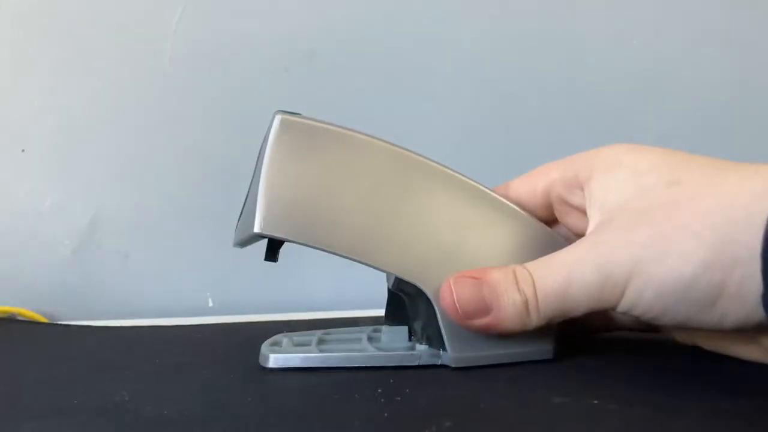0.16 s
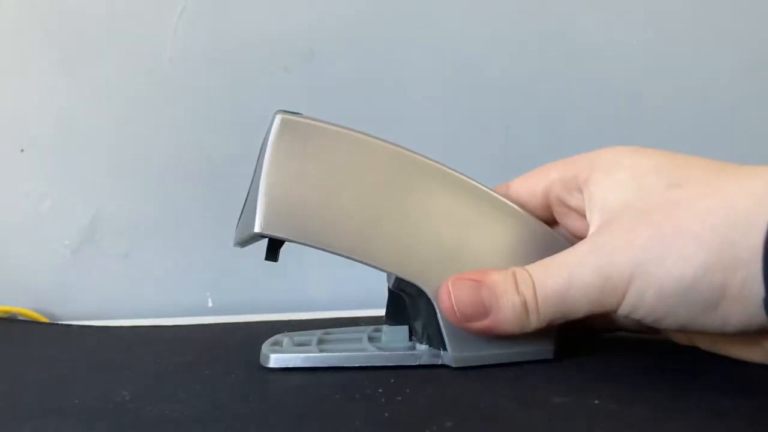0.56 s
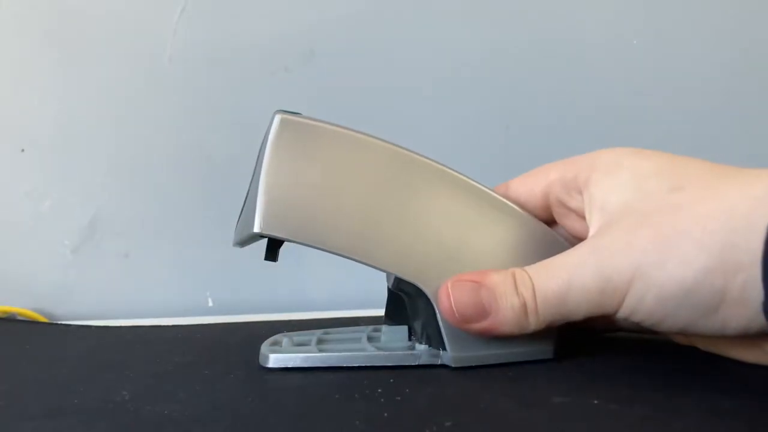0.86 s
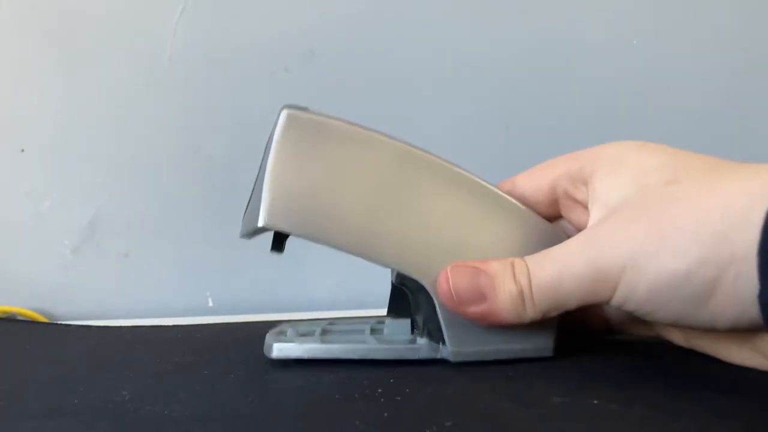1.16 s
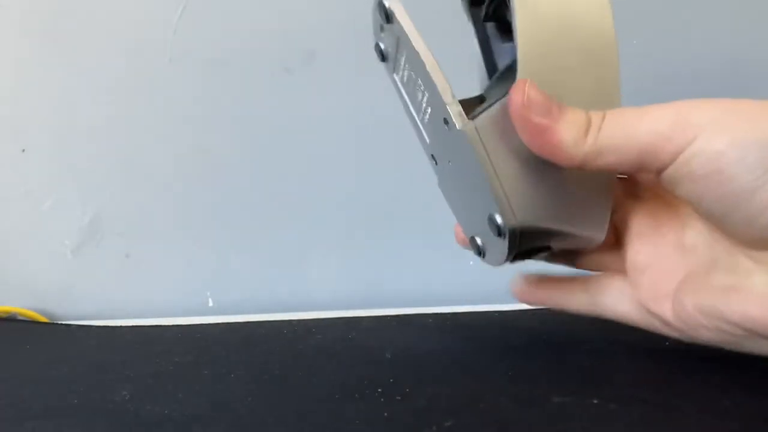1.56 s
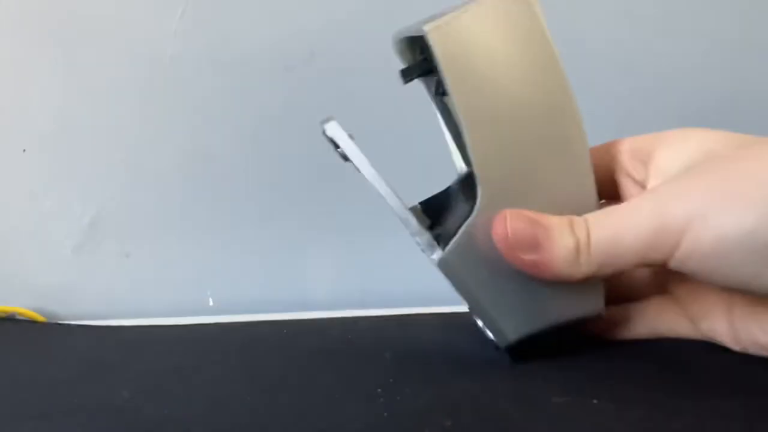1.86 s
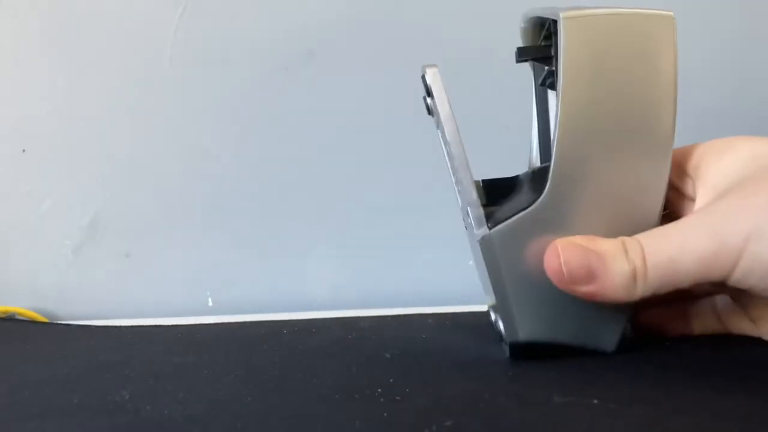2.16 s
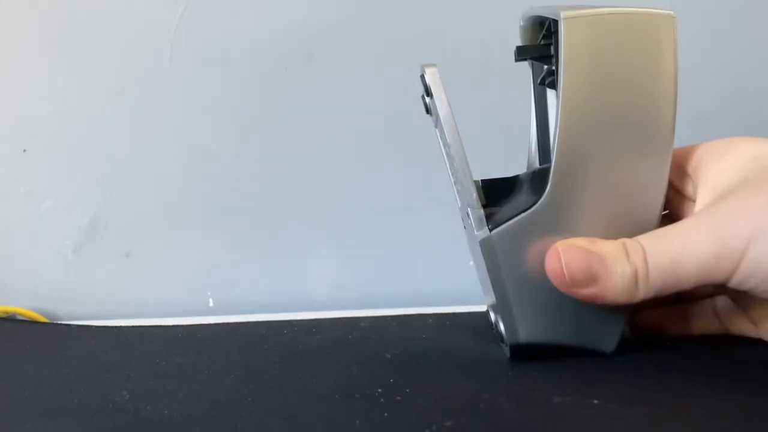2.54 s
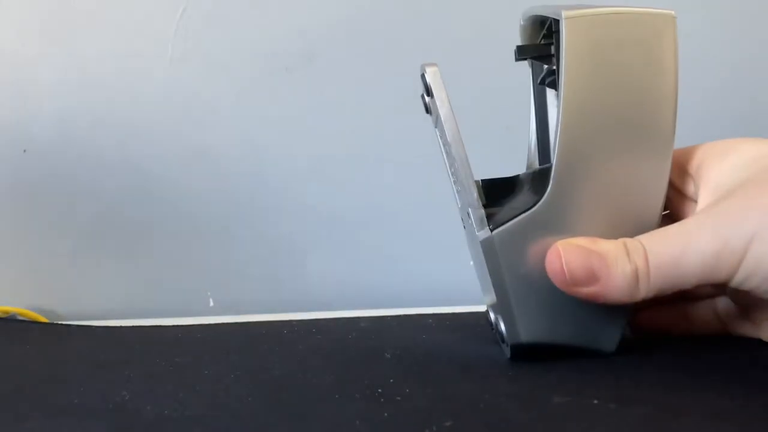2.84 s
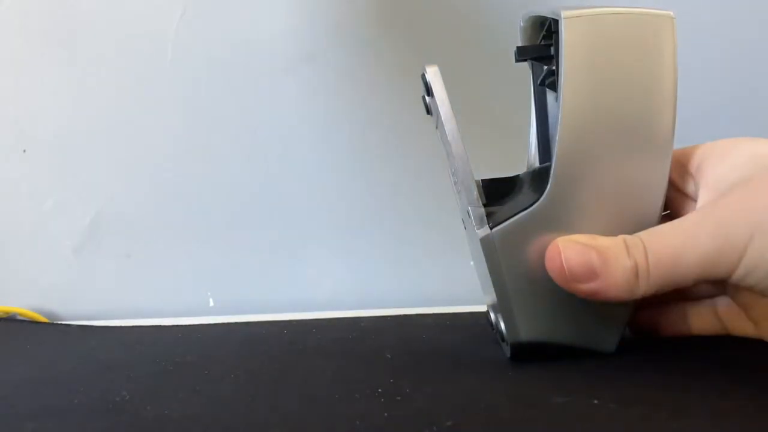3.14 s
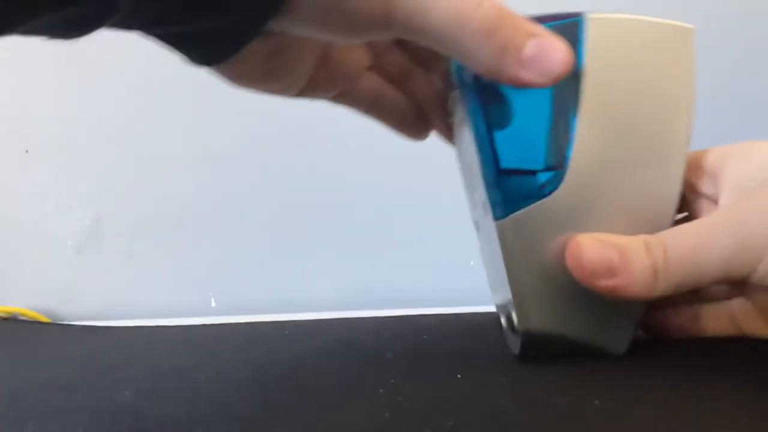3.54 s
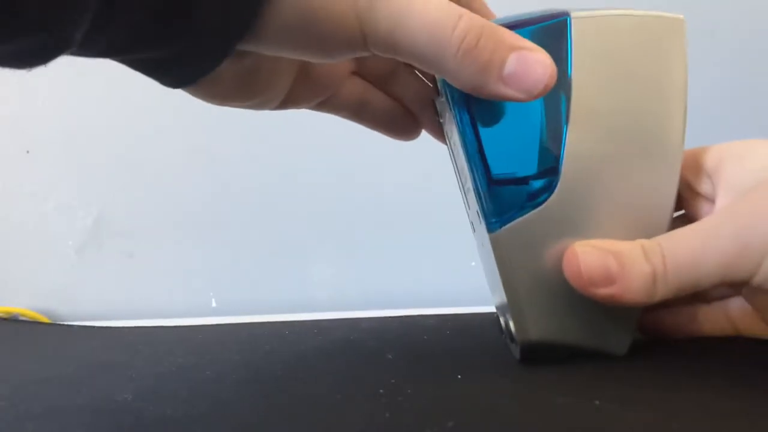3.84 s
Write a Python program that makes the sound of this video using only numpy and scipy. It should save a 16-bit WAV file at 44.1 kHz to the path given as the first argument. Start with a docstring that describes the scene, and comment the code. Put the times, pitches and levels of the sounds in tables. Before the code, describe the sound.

Sharp plastic snap with a quick run of clicks, preceded by light handling and a thump.

```python
"""A close stereo pair in a small quiet room: air and a wavering hum, as a container slides away over cloth.
Sleeve and palm rustle as a hand lifts a plastic stapler off a cloth-covered desk and stands it on its heel.
Loose parts tick, the hollow base knocks, the spring pings and the heel drags: modes, thumps and noise.
A container knocks the shell, scrapes its guides as dense tiny slips, and snaps in with a run of clicks.
The overall level dips briefly, comes back a little higher, and a faint tone comes and goes."""
import sys
import numpy as np
from scipy import signal
from scipy.fft import rfft, irfft
from scipy.io import wavfile
from scipy.ndimage import uniform_filter1d

SR = 44100
rng = np.random.default_rng(int(sys.argv[2]) if len(sys.argv) > 2 else 0)


def put_to_file(sound):
    """Save the sound as 16-bit audio at rate SR, in the file named by the first command-line argument."""
    columns = np.atleast_2d(sound).T  # one column per channel
    safe = np.clip(columns, -1, 1)
    whole_steps = np.round(safe * 32767)
    wavfile.write(sys.argv[1], SR, whole_steps.astype(np.int16))


N = 176400  # 4 s

# All levels are relative: the room, the overall level and the microphone act on them later.
# air of the room: (frequency [Hz], level [dB per Hz])
AIR_SPECTRUM = [(20, -33.5), (60, -1), (140, -5.5), (250, -5), (330, -14.5), (520, -13.5), (760, -23.5),
                (1600, -39), (4000, -51.5), (16000, -61.5)]
# steady hum lines: (frequency [Hz], level [dB])
HUM_LINES = [(144, -56.5), (361, -66.5)]
AIR_DB = -53
HUM_WAVER = 0.09  # rms share of each line

# container sliding away over the cloth: (frequency [Hz], level [dB per Hz])
SLIDE_SPECTRUM = [(600, -8.5), (1700, -2.5), (2600, -1.5), (3600, -10), (4700, -4.5), (16000, -30)]
SLIDE_DB, SLIDE_T60_S = -44.5, 0.28

# sleeve and hand rubbing: (time [s], treble level [dB], middle level [dB])
RUB_LEVELS = [(0, -53, -80), (0.28, -67, -70.5), (0.36, -100, -86), (0.89, -100, -80), (0.99, -72, -59),
              (1.09, -63.5, -63), (1.14, -87, -77), (1.2, -70.5, -65.5), (1.37, -61.5, -60),
              (1.55, -73.5, -83.5), (1.66, -61, -53.5), (1.74, -62, -53), (1.82, -73, -68.5),
              (1.95, -74, -76), (2.01, -62, -61), (2.14, -71, -65.5), (2.22, -100, -106)]
# treble of the sleeve: (frequency [Hz], level [dB per Hz])
SLEEVE_SPECTRUM = [(1000, -12.5), (4400, 0), (5700, -7), (7600, 2), (9200, -9.5), (16000, -6)]
# middle of the palm: (frequency [Hz], level [dB per Hz])
PALM_SPECTRUM = [(400, -21), (970, -0.5), (1200, -1.5), (1450, -2), (1900, -10), (8000, -37.5)]
# unevenness of slips: cloth of the sleeve, and the coarser rubs of palm and plastic
SLEEVE_SPREAD_DB, COARSE_SPREAD_DB = 2.2, 4.5
SLIPS_PER_S, GRIP_FLUTTER_DB = 6000, 0.9  # average rate; rms unsteadiness

# contacts of plastic parts:
# (time [s], ring level [dB], most excited pitch [Hz], crack level [dB], tick level [dB])
PLASTIC_CONTACTS = [ (0.671, -46, 1050, -50, -67), (0.958, -40.5, 874, -66, -80),
                    (1.7166, -30, 1300, -35, -61), (1.7229, -27, 1000, -28, -43),
                    (1.7321, -32.5, 1400, -32.5, -41.5), (1.883, -52.5, 1100, -56, -85),
                    (2.134, -31, 1480, -39.5, -52), (2.642, -50, 980, -55, -76),
                    (2.668, -46, 850, -48.5, -56.5), (3.2719, -19.5, 1100, -12.5, -12.5),
                    (3.2752, -8, 850, -8.5, -24), (3.2776, -16.5, 950, -17, -29.5),
                    (3.319, -15.5, 1300, -20, -27), (3.3294, -12, 1247, -16, -25.5),
                    (3.3461, -4.5, 1100, -14.5, -16), (3.3479, -5.5, 1400, -20.5, -26.5),
                    (3.3551, -11.5, 850, -15, -12.5), (3.3584, -21, 1300, -22.5, -13.5),
                    (3.362, -13.5, 1400, -23, -21), (3.3647, -12, 855, -16, -25),
                    (3.553, -43.5, 950, -56, -79)]
# pitches of the shell modes: (frequency [Hz])
SHELL_MODES_HZ = [638, 818, 941, 1037, 1147, 1270, 1427, 1528, 1952, 2442]
# strengths of the shell modes, in the same order: (level [dB])
SHELL_MODES_DB = [-2, -2.5, -2, -6, -4, -10, -2, -4, -10.5, -1]
# dense upper modes after a blunt contact: (frequency [Hz], level [dB per Hz])
CRACK_SPECTRUM = [(100, -2), (350, 1), (520, -6), (900, -1.5), (1600, 0), (2800, -6.5), (4000, -5),
                  (5200, -15), (7500, -24), (16000, -26.5)]
# dense upper modes after a sharp contact: (frequency [Hz], level [dB per Hz])
TICK_SPECTRUM = [(1500, -18.5), (5500, -17), (6600, 1.5), (7600, 4), (9000, -14), (10200, -2),
                 (13300, -13.5), (15300, -12), (17000, -24)]
SHELL_T60_S, CRACK_T60_S, TICK_T60_S = 0.032, 0.022, 0.02
RING_RISE_S, CONTACT_RISE_S = 0.001, 0.00052
SHARED_POWER = 0.11  # part of the crack and tick power that is the same in every contact
FOCUS_DB_PER_OCTAVE2 = 24.5  # loss of a mode with its squared distance from the excited pitch

# hollow base as it tips up, lands and is pushed: (time [s], level [dB], most excited pitch [Hz])
BASE_HITS = [(0.96, -23, 275), (1.727, -20, 343), (3.274, -12, 380)]
# modes of the hollow base: (frequency [Hz], level [dB], decay T60 [s])
BASE_MODES = [(239, 4.5, 0.05), (331, -2, 0.04), (376, 2.5, 0.03), (514, 0.5, 0.029)]
BASE_RISE_S = 0.0052

# blows passed on to the desk: (time [s], level [dB], pitch [Hz], decay T60 [s])
DESK_THUMPS = [(1.7246, 4.5, 100, 0.0535), (3.2788, 5.5, 109.1, 0.064)]
# slower modes of the desk: (frequency [Hz], level [dB], decay T60 [s])
DESK_MODES = [(57.4, -27.5, 0.088), (81.25, -14.5, 0.1)]
THUMP_RISE_S = 0.011

# pings of the metal spring: (time [s], level [dB], most excited pitch [Hz])
SPRING_PINGS = [(1.779, -46.5, 2760), (2.639, -64, 3900), (2.663, -53, 4500), (2.671, -45, 4470),
                (2.718, -76, 4400), (3.2748, -7.5, 7500), (3.276, -18, 3587)]
# modes of the metal spring: (frequency [Hz], level [dB], decay T60 [s])
SPRING_MODES = [(2436, -1.5, 0.033), (3260, -8.5, .06), (4360, -1, 0.049), (7400, -0.5, 0.0066)]

# heel dragging on the desk, its end levels held: (time [s], level [dB])
DRAG_LEVELS = [(1.78, -68), (1.9, -44), (2.14, -45.5), (2.23, -61)]
# low noise of the drag: (frequency [Hz], level [dB per Hz])
DRAG_SPECTRUM = [(25, -19), (55, 4), (105, -1.5), (170, -19.5), (1500, -52)]

# plastic sliding on plastic: (time [s], length [s], level [dB])
SCRAPE_STROKES = [(2.626, 0.13, -60.5), (3.248, 0.1, -25)]
# sound of the scrape: (frequency [Hz], level [dB per Hz])
SCRAPE_SPECTRUM = [(400, -14.5), (1100, 9.5), (1450, 6), (1800, 0), (4200, -11), (7500, -18), (16000, -33)]

# faint tone after the snap
TONE_S, TONE_LENGTH_S, TONE_HZ, TONE_DB = 3.63, 0.3, 705, -66

# overall level, with a brief dip after the snap: (time [s], level [dB])
OVERALL_LEVEL = [(3.37, 1.5), (3.45, -12), (3.54, -4.5), (3.62, 4.5)]
# diffuse decay of the room: (frequency [Hz], decay T60 [s])
ROOM_DECAY = [(60, 0.15), (250, 0.57), (900, 0.27), (5000, 0.24), (15000, 0.11)]
# near reflections: (delay left [s], delay right [s], gain [linear])
NEAR_ECHOES = [(.0031, 0.0026, 0.21), (.0074, 0.0065, 0.26)]
ROOM_DB, ROOM_ONSET_S = -13.5, 0.0025
# likeness of noise at the left and right microphones: (frequency [Hz], correlation [-1 to 1])
LEFT_RIGHT_LIKENESS = [(60, 0.94), (300, 0.71), (1400, -0.23), (4000, 0.3), (7500, 0.0067), (15000, 0.65)]
LOW_CUT_HZ, BAND_EDGE_HZ = 42, 16150


def amp(db):
    """Decibels to gain."""
    return 10 ** (np.asarray(db) / 20)


def unit(x):
    """Scales to rms 1."""
    return x / np.sqrt(np.mean(x ** 2) + 1e-20)


def read(points, hz):
    """Reads a table on a log-frequency axis."""
    f, value = np.transpose(points)
    return np.interp(np.log(hz + 1), np.log(f + 1), value)


def level(points, column=1):
    """Gain over time from one dB column of a table."""
    rows = np.array(points)
    return amp(np.interp(np.arange(N) / SR, rows[:, 0], rows[:, column]))


def add(mix, s, sound):
    """Mixes a sound in at time s."""
    part = mix[:, round(s * SR):][:, :sound.shape[-1]]
    part += sound[..., :part.shape[1]]


def rise(t, seconds):
    """Smooth onset."""
    return np.sin(np.pi / 2 * np.minimum(t / seconds, 1)) ** 2


def swell(s, length):
    """Half a sine that starts at time s."""
    return np.sin(np.pi * np.clip((np.arange(N) / SR - s) / length, 0, 1))


def colour(pair, spectrum):
    """Gives two unrelated signals a spectrum and the left-right likeness of the microphones."""
    size = pair.shape[1]
    hz = np.fft.rfftfreq(size, 1 / SR)
    a, b = rfft(pair)
    likeness = np.clip(read(LEFT_RIGHT_LIKENESS, hz), -1, 1)
    mid = a * np.sqrt(1 + likeness)
    side = b * np.sqrt(1 - likeness)
    stereo = np.array([mid + side, mid - side]) * amp(read(spectrum, hz))
    return unit(irfft(stereo, size))


def noise(spectrum, size=N):
    """Steady stereo noise."""
    return colour(rng.standard_normal((2, size)), spectrum)


def friction(spectrum, spread_db):
    """A dense run of tiny slips of uneven size under a slightly unsteady grip."""
    sizes = amp(spread_db * np.minimum(rng.exponential(1, N), 4))
    slips = sizes * (rng.random(N) < SLIPS_PER_S / SR)
    wander = uniform_filter1d(rng.standard_normal(N), size=900)
    grip = unit(uniform_filter1d(wander, size=500))
    return colour(slips * amp(GRIP_FLUTTER_DB * grip) * rng.standard_normal((2, N)), spectrum)


def mode(t, hz, db, t60, turn=0):
    """One dying vibration; turn is its starting phase in cycles."""
    return amp(db - 60 * t / t60) * np.sin(2 * np.pi * (hz * t + turn))


def ring(t, modes, focus_hz):
    """A set of modes, excited most strongly around one pitch, starting at random phases."""
    out = np.zeros(len(t))
    for hz, db, t60 in modes:
        loss_db = FOCUS_DB_PER_OCTAVE2 * np.log2(hz / focus_hz) ** 2
        out += mode(t, hz, db - loss_db, t60, rng.random())
    return out


def room_tone():
    """Low steady air, and hum lines whose strength and phase drift slowly."""
    t, hum = np.arange(N) / SR, np.zeros(N)
    for hz, db in HUM_LINES:
        wander = uniform_filter1d(rng.standard_normal((2, N)), size=4000)
        drift = HUM_WAVER * unit(uniform_filter1d(wander, size=4000))
        turn = 2 * np.pi * hz * t
        line = (1 + drift[0]) * np.cos(turn) - drift[1] * np.sin(turn)
        hum += np.sqrt(2) * amp(db) * line
    return amp(AIR_DB) * noise(AIR_SPECTRUM) + hum


def slide():
    """The container slides away over the cloth: friction that dies away from the start."""
    fade = amp(SLIDE_DB - 60 * np.arange(N) / SR / SLIDE_T60_S)
    return fade * friction(SLIDE_SPECTRUM, COARSE_SPREAD_DB)


def rustle():
    """Friction of the sleeve in the treble and of the palm in the middle, each with its own level."""
    sleeve = level(RUB_LEVELS, column=1) * friction(SLEEVE_SPECTRUM, SLEEVE_SPREAD_DB)
    palm = level(RUB_LEVELS, column=2) * friction(PALM_SPECTRUM, COARSE_SPREAD_DB)
    return sleeve + palm


def contacts():
    """Each contact rings the shell around one pitch and adds a dying noise crack and a bright tick."""
    out, t = np.zeros((2, N)), np.arange(8192) / SR
    shell = [(hz, db, SHELL_T60_S) for hz, db in zip(SHELL_MODES_HZ, SHELL_MODES_DB)]
    upper = []
    for spectrum, t60 in [(CRACK_SPECTRUM, CRACK_T60_S), (TICK_SPECTRUM, TICK_T60_S)]:
        upper.append((spectrum, t60, noise(spectrum, len(t))))
    for s, ring_db, focus_hz, *upper_db in PLASTIC_CONTACTS:
        sound = amp(ring_db) * rise(t, RING_RISE_S) * ring(t, shell, focus_hz)
        for db, (spectrum, t60, common) in zip(upper_db, upper):
            own = noise(spectrum, len(t))
            burst = np.sqrt(SHARED_POWER) * common + np.sqrt(1 - SHARED_POWER) * own
            sound = sound + burst * amp(db - 60 * t / t60)
        add(out, s, rise(t, CONTACT_RISE_S) * sound)
    return out


def base_knocks():
    """The hollow base rings softly around one pitch at each knock."""
    out, t = np.zeros((2, N)), np.arange(SR // 2) / SR
    for s, db, focus_hz in BASE_HITS:
        add(out, s, amp(db) * rise(t, BASE_RISE_S) * ring(t, BASE_MODES, focus_hz))
    return out


def desk_thumps():
    """Cushioned blows sound one low pitch and the slower modes of the desk."""
    out, t = np.zeros((2, N)), np.arange(SR // 2) / SR
    for s, db, hz, t60 in DESK_THUMPS:
        boom = mode(t, hz, 0, t60) + sum(mode(t, *row) for row in DESK_MODES)
        add(out, s, amp(db) * rise(t, THUMP_RISE_S) * boom)
    return out


def spring():
    """Thin modal pings of the metal spring as the grip shifts and the container strikes."""
    out, t = np.zeros((2, N)), np.arange(SR // 4) / SR
    for s, db, focus_hz in SPRING_PINGS:
        add(out, s, amp(db) * rise(t, RING_RISE_S) * ring(t, SPRING_MODES, focus_hz))
    return out


def heel_drag():
    """The heel drags on the desk: low noise that swells and sinks."""
    return level(DRAG_LEVELS) * noise(DRAG_SPECTRUM)


def scrapes():
    """Plastic slides on plastic: friction under half-sine strokes."""
    strokes = sum(amp(db) * swell(s, length) for s, length, db in SCRAPE_STROKES)
    return strokes * friction(SCRAPE_SPECTRUM, COARSE_SPREAD_DB)


def faint_tone():
    """A single sine that comes and goes."""
    t = np.arange(N) / SR
    return amp(TONE_DB) * swell(TONE_S, TONE_LENGTH_S) * np.sin(2 * np.pi * TONE_HZ * t)


def room(x):
    """Adds reflections from desk and wall and a short diffuse tail that decays at its own rate per pitch."""
    white = noise([(20, 0), (20000, 0)], SR // 2)
    hz, t, bins = signal.stft(white, SR, nperseg=256)
    decay = amp(-60 * t / read(ROOM_DECAY, hz)[:, None])
    tail = signal.istft(bins * decay, SR, nperseg=256)[1]
    tail *= rise(np.arange(tail.shape[1]) / SR, ROOM_ONSET_S)
    tail *= amp(ROOM_DB) / np.linalg.norm(tail[0])
    for left_s, right_s, gain in NEAR_ECHOES:
        tail[[0, 1], [round(left_s * SR), round(right_s * SR)]] += gain
    return x + signal.fftconvolve(x, tail, axes=1)[:, :N]


def scene():
    """All the handling in the room, over the room tone."""
    low_knocks = (base_knocks() + desk_thumps()) * amp([[-1.1], [1.1]])  # a little to the right
    rubbing = slide() + rustle() + heel_drag() + scrapes()
    handling = room(contacts() + low_knocks + spring() + rubbing)
    background = (room_tone() + faint_tone()) * amp([[-.7], [.7]])
    return level(OVERALL_LEVEL) * (handling + background)


def record(dry):
    """The microphone loses the deepest bass and rounds off peaks; then the band limit."""
    low_cut = signal.butter(2, LOW_CUT_HZ, "highpass", fs=SR, output="sos")
    thin = signal.sosfilt(low_cut, dry)
    rounded = thin / (1 + (thin / .95) ** 6) ** (1 / 6)
    band_limit = signal.firwin(255, BAND_EDGE_HZ, window=("kaiser", 9), fs=SR)
    return signal.oaconvolve(rounded, band_limit[None], "same")


dry = scene()
out = record(dry)
put_to_file(out)
```